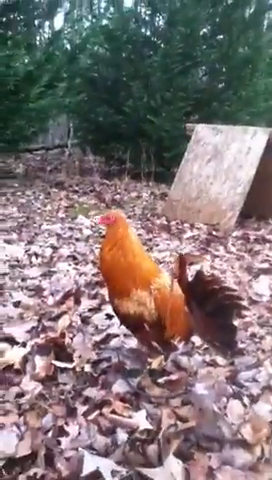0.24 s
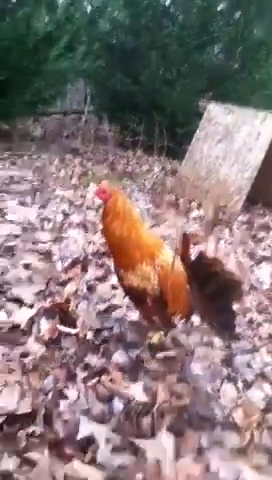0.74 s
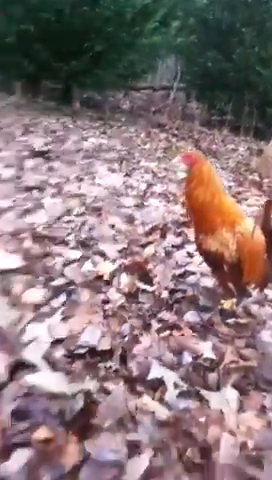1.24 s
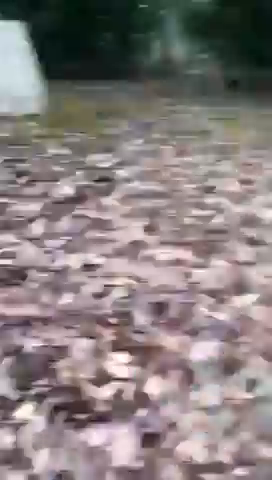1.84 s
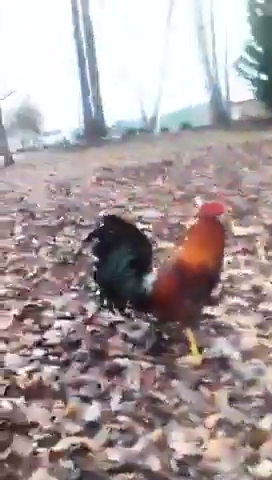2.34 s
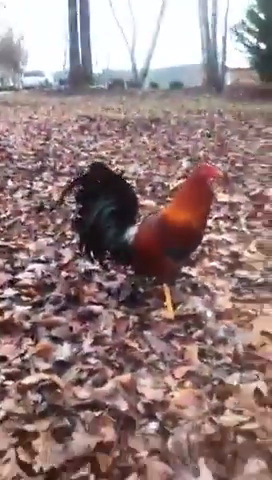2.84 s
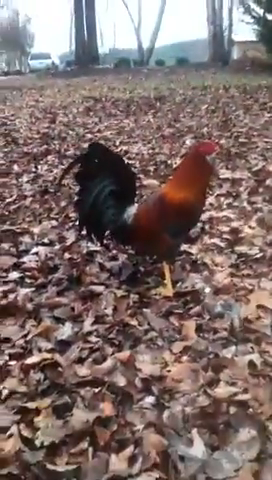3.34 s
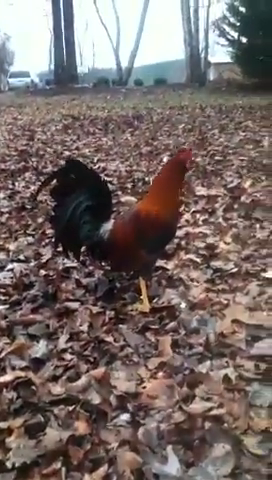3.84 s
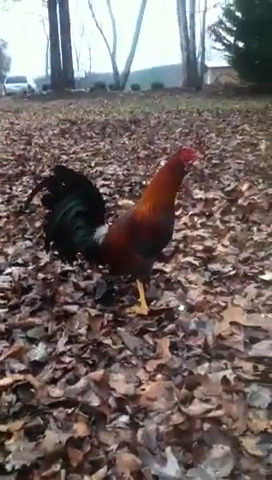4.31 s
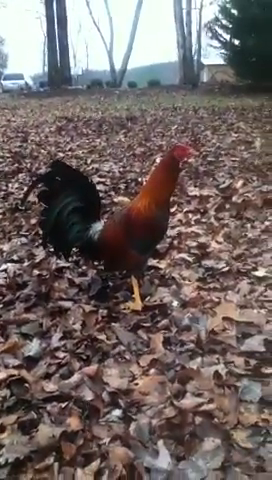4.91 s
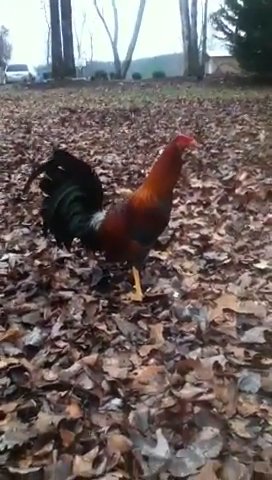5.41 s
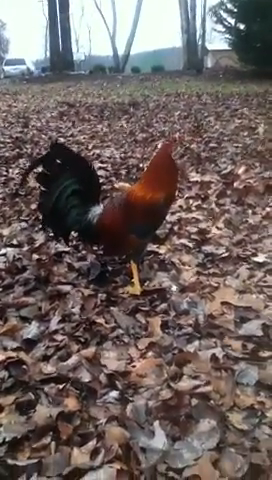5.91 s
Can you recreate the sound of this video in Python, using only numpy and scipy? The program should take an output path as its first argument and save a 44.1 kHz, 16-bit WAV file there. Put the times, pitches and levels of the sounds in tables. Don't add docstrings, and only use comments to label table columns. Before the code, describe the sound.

A few dry leaf crunches and a tap on the phone, then a young rooster crows one loud, raspy four-note call in a yard.

```python
import sys
import numpy as np
from scipy import signal
from scipy.fft import rfft, irfft
from scipy.io import wavfile
from scipy.ndimage import uniform_filter1d, minimum_filter1d, map_coordinates

SR = 44100
rng = np.random.default_rng(int(sys.argv[2]) if len(sys.argv) > 2 else 0)


def voltage_ratio(level):
    return 10 ** (np.asarray(level, float) / 20)


def store_pcm(level_fs):
    pcm = np.round(np.clip(level_fs, -1, 1) * 32767).astype(np.int16)
    wavfile.write(sys.argv[1], SR, np.atleast_2d(pcm).T)


N = 271656
T = np.arange(N) / SR

# (centre [Hz], width [Hz], level [dB])
THROAT = [(850, 180, 4), (1330, 570, -6.5), (1804, 500, -3.5), (2764, 140, -15), (3585, 330, -11.5),
          (6940, 2100, -28), (6340, 7400, -35), (8400, 1670, -38), (9800, 1000, -45.5)]
# (time [s], level drop [dB])
FLUTTER = [(3.780, 9.5), (3.801, 5.5), (3.821, -1.5), (3.838, 1.5), (3.856, 5.5), (3.946, 12.5), (4.654, 3),
           (4.701, 2)]
FLUTTER_HALF_MS = 1.3


def read(table, silent=None):
    s, *columns = np.transpose(table)
    return [np.interp(T, s, c, left=silent, right=silent) for c in columns]


def sounding(table, fade_s=.003):
    return np.clip(np.minimum(T - table[0][0], table[-1][0] - T) / fade_s, 0, 1)


def bell(s, half_ms):
    return np.exp(-((T - s) / (half_ms / 1000)) ** 2)


def unit(x):
    return x / np.sqrt(np.mean(x ** 2))


def resonate(x, modes):
    out = 0
    for hz, width_hz, db in modes:
        edges_hz = [max(hz - width_hz / 2, 20), min(hz + width_hz / 2, SR / 2.1)]
        band = signal.butter(2, edges_hz, "band", fs=SR, output="sos")
        out = out + voltage_ratio(db) * signal.sosfilt(band, x)
    return out


def wobble(rate_hz):
    low = signal.butter(2, rate_hz, fs=SR, output="sos")
    return unit(signal.sosfilt(low, rng.standard_normal(N)))


def stack(hz, rough, partial_db, jitter=.09, shimmer_db=5):
    wavering_hz = hz * (1 + jitter * rough * wobble(260))
    phase = 2 * np.pi * np.cumsum(wavering_hz) / SR
    out = 0
    for k, db in enumerate(partial_db):
        depth = rough * min(k + 1, 4) + .5 * (k > 1) + 0.19 * (k > 3)
        swing_db = shimmer_db * depth * np.minimum(wobble(65), .6)
        out = out + voltage_ratio(db + swing_db) * np.sin((k + 1) * phase + k * k)
    return np.sqrt(2) * out, phase


def yard():
    # (frequency [Hz], density [dB per Hz])
    yard_colour = [(15, -49.5), (25, -24.5), (108, -1.5), (326, -11.5), (476, -16.5), (641, -20),
                   (695, -18), (887, -18), (1260, -22.5), (2690, -27), (3720, -27), (12500, -30),
                   (16000, -35.5)]
    # (time [s], level [dB])
    traffic = [(0.0, -62), (0.17, -61.5), (0.47, -57), (0.66, -59.5), (1.06, -61), (1.53, -58.5),
               (1.9, -60.5), (2.96, -58.5), (3.7, -61.5)]
    yard_db = -57
    hz = np.maximum(np.arange(N // 2 + 1) * SR / N, 1)
    colour_hz, colour_db = np.transpose(yard_colour)
    colour = voltage_ratio(np.interp(np.log(hz), np.log(colour_hz), colour_db))
    noise = rfft(rng.standard_normal(N)) * colour
    swell_db = read(traffic)[0]
    swell_db = swell_db - swell_db.mean()
    out = 0
    for octave in range(5, 15):
        band = np.clip(1 - np.abs(np.log2(hz) - octave), 0, 1)
        restless = np.clip((11 - octave) / 4, 0, 1)
        motion_db = restless * (1.3 * swell_db + 1.8 * wobble(1.8))
        out = out + irfft(noise * band, N) * voltage_ratio(motion_db)
    return unit(out) * voltage_ratio(yard_db)


def birds():
    # (time [s], length [s], start pitch [Hz], end pitch [Hz], level [dB])
    calls = [
        (2.752, 0.18, 3280, 3200, -75.5),
        (5.979, 0.192, 2800, 2640, -75),
    ]
    out = 0
    for s, length_s, start_hz, end_hz, db in calls:
        done = np.clip((T - s) / length_s, 0, 1)
        whistle, _ = stack(start_hz + (end_hz - start_hz) * done, 0.2, [0])
        out = out + voltage_ratio(db) * np.sin(np.pi * done) ** 0.288 * whistle
    return out


def trees(voice):
    # (centre [Hz], width [Hz], level [dB], T60 [s])
    trunks = [(910, 310, -16.5, 1.8), (1900, 270, -4.5, 1.88), (2780, 500, -0.5, 1.4),
              (5000, 5000, -2.5, 1)]
    sway_ms, sway_hz = .05, 14
    t = T[:int(1.6 * SR)]
    near = voltage_ratio(-51) * rng.standard_normal(len(t)) * voltage_ratio(-60 * t / .12) * (t > .002)
    shed = voltage_ratio(-51) * rng.standard_normal(len(t)) * voltage_ratio(-60 * t / 0.34) * (t > .03)
    scatter = rng.standard_normal(len(t))
    far = 0
    for hz, width_hz, db, t60_s in trunks:
        far = far + resonate(scatter, [(hz, width_hz, db)]) * voltage_ratio(-60 * t / t60_s)
    far = voltage_ratio(-60.0) * far * np.clip(t / 0.057, 0, 1) * voltage_ratio(1.2 * wobble(7.3)[:len(t)])
    late = signal.fftconvolve(voice, shed + far)[:N]
    swayed_s = T + sway_ms / 1000 * wobble(sway_hz)
    late = map_coordinates(late, [swayed_s * SR], mode="mirror")
    return signal.fftconvolve(voice, near)[:N] + late


def rustle(s, hold_s):
    rise_db_s, settle_db_s = 712, 465
    early_s, late_s = np.clip(s - T, 0, None), np.clip(T - s - hold_s, 0, None)
    return voltage_ratio(-rise_db_s * early_s - settle_db_s * late_s)


def leaves():
    # (time [s], hold [s], crunch [dB], hiss [dB])
    rustles = [(0.203, 0.0037, -57.5, -68), (0.749, 0.021, -51, -55.5), (0.861, 0.11, -73, -62.5),
               (1.058, 0.029, -78, -56.5), (1.175, .005, -63, -63), (1.253, .005, -64, -64),
               (1.35, 0.12, -80, -59.5), (1.394, 0.051, -46, -75), (1.465, 0.063, -54.5, -65.5),
               (1.626, 0.059, -56.5, -63), (1.686, 0.063, -58.5, -66), (1.72, 0.74, -68, -65),
               (2.087, 0.02, -80, -66), (2.174, 0.03, -67, -69.5), (2.377, .005, -69, -80),
               (2.439, 0.0094, -53.5, -59), (2.5, 0.59, -68, -70), (3.152, .005, -75, -70.5),
               (3.215, .003, -73, -65)]
    # (centre [Hz], width [Hz], level [dB])
    crunch_ring = [(455, 300, 15), (900, 350, 12), (1246, 880, 15), (1810, 490, -1)]
    # (centre [Hz], width [Hz], level [dB])
    hiss_ring = [(3630, 2600, 9), (5960, 3900, 8), (8640, 4600, 0.5), (14300, 3900, 2.5)]
    # (time [s], hold [s], level [dB])
    curls = [
        (1.43, 0.078, -61.5),
        (1.65, .11, -61.5),
    ]
    # (centre [Hz], width [Hz], level [dB])
    curl_ring = [(5840, 860, 0)]
    size = voltage_ratio(2.8 * rng.exponential(size=(2, N)))
    cracks = rng.standard_normal((2, N)) * size * (rng.random((2, N)) < .3)
    crunch = unit(resonate(cracks[0], crunch_ring)) * voltage_ratio(1.8 * wobble(50))
    hiss = unit(resonate(cracks[1], hiss_ring)) * voltage_ratio(0.3 * wobble(43))
    curl = unit(resonate(cracks[0], curl_ring))
    out = 0
    for s, hold_s, crunch_db, hiss_db in rustles:
        out = out + rustle(s, hold_s) * (voltage_ratio(crunch_db) * crunch + voltage_ratio(hiss_db) * hiss)
    for s, hold_s, db in curls:
        out = out + rustle(s, hold_s) * voltage_ratio(db) * curl
    return out


def snaps():
    # (time [s], peak [dB], ring [Hz])
    leaf_snaps = [(1.392, -38, 840), (1.418, -34, 850), (1.426, -29, 980), (1.432, -34, 1400),
                  (1.443, -38, 993), (1.467, -34, 980), (1.491, -35.5, 1380), (1.51, -44, 1350),
                  (1.555, -46, 900), (1.622, -42, 990), (1.641, -43, 1390), (1.683, -40, 1070),
                  (1.692, -41, 1290), (1.704, -41.5, 1020), (1.754, -43, 1000), (2.441, -40, 813)]
    t60_s, rise_s, gain_db = 0.018, .0012, -1
    out, t = np.zeros(N), T[:900]
    decay = voltage_ratio(-60 * t / t60_s)
    for s, db, hz in leaf_snaps:
        grit = .3 * rng.standard_normal(len(t)) * decay
        ring = np.sin(2 * np.pi * hz * t) + grit
        i = int(s * SR)
        out[i:i + len(t)] += voltage_ratio(db + gain_db) * decay * np.minimum(t / rise_s, 1) * ring
    return out


def taps():
    # (time [s], peak [dB], body [Hz], crack [dB], push [dB])
    case_taps = [
        (0.859, -18.5, 384, -15.5, -2.5),
        (1.171, -45.5, 710, -12, -10),
        (1.383, -36, 396, -16, 1),
        (2.167, -45, 477, -15, -1),
        (2.347, -48.5, 425, -16, -1),
        (2.449, -44.5, 814, -7.5, 3),
    ]
    tick_ring = [(3640, 700, 8.4), (5200, 620, 9.6), (6400, 1060, 8.4), (8300, 1300, 1.7)]
    out, t = np.zeros(N), T[:1200]
    push = -1.2 * np.sin(np.pi * np.clip(t / 0.00055, 0, 1))
    late = np.clip(t - .0004, 0, None)
    for s, db, hz, crack_db, push_db in case_taps:
        cycles = hz * late * np.exp(-late / 0.012)
        swing = 2.06 * np.sin(2 * np.pi * cycles) * np.exp(-late / 0.0016)
        grit = 0.34 * rng.standard_normal(len(t)) * np.exp(-t / 0.0012)
        tick = resonate(3.6 * (t == 0) + grit, tick_ring)
        i = int((s + 0.0033) * SR)
        out[i:i + len(t)] += voltage_ratio(db) * (voltage_ratio(push_db) * push + swing + voltage_ratio(crack_db + 9.0) * tick)
    return signal.sosfilt(signal.butter(2, 90, "high", fs=SR, output="sos"), out)


def beak_thumps():
    # (time [s], half length [ms], pitch [Hz], level [dB])
    thumps = [
        (4.028, 10.5, 260, -45.5),
        (4.249, 11, 330, -51.5),
        (5.141, 5.9, 230, -49),
    ]
    out = 0
    for s, half_ms, hz, db in thumps:
        out = out + voltage_ratio(db) * bell(s, half_ms) * stack(hz + 0 * T, 0.31, [0, -4])[0]
    return out


def gulp():
    # (time [s], pitch [Hz], level [dB])
    gulp_curve = [(4.863, 269, -32), (4.872, 275.6, -38), (4.883, 308.7, -31), (4.893, 308, -38)]
    partial_db = [-11.5, -11.5, 2.5, 2.5, -16.5, -12.5, -21.5, -19.5, -19.0, -21, -19.5, -26.0, -32.0, -31.5]
    hz, db = read(gulp_curve)
    tone, _ = stack(hz, 0.31, partial_db)
    breath = unit(resonate(rng.standard_normal(N), THROAT))
    return sounding(gulp_curve) * voltage_ratio(db) * (tone + 0.8 * breath)


def soft_voice():
    # (time [s], second partial [Hz], level [dB])
    stretches = [
        [(3.732, 1102, -26.5), (3.74, 1185, -22.5), (3.75, 1260, -23.5), (3.758, 1320, -22)],
        [(3.958, 1180, -22.5), (3.966, 1242, -24), (4.006, 1173, -27.5), (4.015, 1310, -22.5)],
        [(4.14, 1001, -27), (4.17, 1054, -46), (4.201, 1200, -38), (4.222, 1248, -30.5)],
        [(4.772, 1281, -28), (4.778, 1240, -27.5), (4.802, 1185, -35.5), (4.854, 1148, -45.5),
         (4.862, 1124, -33.5)],
        [(4.89, 1148, -32.5), (4.912, 1179, -36.5), (4.948, 1214, -27.5), (4.962, 1278, -25), (4.97, 1320, -29)],
    ]
    # (time [s], second partial [Hz], level [dB])
    last_fall = [(5.129, 1497, -35), (5.139, 1259, -28.5), (5.148, 1012, -33), (5.16, 777, -44)]
    soft_rough = [.2, .12, .35, .27, .11, .2]
    # (multiple, level [dB])
    soft_partials = [(1, -13), (2, 2.5), (3, -6.5), (4, -16), (5, -17), (6, -23), (7, -42.5), (8, -48),
                     (9, -52.5), (10, -52.5), (11, -38), (12, -46)]
    # (time [s], length [s], pitch [Hz],
    # level [dB])
    undertones = [(3.939, 0.011, 1190, -22.5), (4.03, 0.008, 354, -12), (4.061, 0.016, 668.3, -25),
                  (4.257, 0.011, 688, -20), (4.663, 0.018, 1169, -36.5), (4.713, 0.042, 1162, -38.5),
                  (4.797, 0.016, 820, -29.5), (4.92, 0.014, 801.4, -28), (4.16, 0.023, 850, -38),
                  (4.198, 0.04, 825.3, -36.5), (4.868, 0.011, 814, -28.5), (4.981, 0.018, 1301, -41)]
    out = 0
    breath = unit(resonate(rng.standard_normal(N), THROAT))
    partial_db = [db for _, db in soft_partials]
    for part, rough in zip(stretches + [last_fall], soft_rough):
        second_hz, db = read(part)
        tone, _ = stack(second_hz / 2, rough, partial_db)
        out = out + sounding(part) * voltage_ratio(db) * (tone + 2.0 * rough * breath)
    for s, length_s, hz, db in undertones:
        swell = np.exp(-(2 * (T - s) / length_s) ** 2)
        out = out + voltage_ratio(db) * swell * stack(hz + 0 * T, 0.82, [0])[0]
    return out


def roughness(notes):
    # (lock time [s], roughness before [0-1], tired roughness [0-1], last rattle [s])
    locking = [
        (3.865, .14, .2, .024),
        (4.07, .33, .04, .004),
        (4.27, .3, .15, .006),
        (4.975, .2, .04, -.002),
    ]
    locked_rough, last_rough, lock_s, tiring_power = .008, .55, .01, 6
    rough = np.zeros(N)
    for note, (locks, before, tired, last_s) in zip(notes, locking):
        start, end = note[0][0], note[-1][0]
        loose = before * np.clip((locks - T) / lock_s + .5, 0, 1)
        tiring = tired * np.clip((T - locks) / (end - locks), 0, 1) ** tiring_power
        last = last_rough * np.clip((T - end + last_s) / lock_s + .5, 0, 1)
        rough += (T >= start) * (T <= end) * (locked_rough + np.maximum(loose + tiring, last))
    return rough


def sags():
    # (time [s], half length [ms], level drop [dB])
    slips = [(3.766, 4, 3.5), (3.897, 3.6, -2), (3.917, 3.44, -2), (3.952, 3, -1.5), (4.025, 2.2, 6.5),
             (4.039, 2, 8), (4.054, 2.6, 7), (4.062, 2.6, 6), (4.229, 2, 6.5), (4.254, 2.2, 3),
             (4.26, 2.99, 3), (4.661, 4, 3.5), (4.69, 3.4, 4), (4.729, 4.5, 2.5)]
    # (time [s], dip [Hz], half length [ms])
    warbles = [(4.312, 16.5, 5.9), (4.33, 60.6, 4.3), (4.352, 34, 5.5), (4.368, 25.6, 3.6),
               (4.383, 14.4, 6.8), (4.521, 56, 3.1), (4.551, 53.5, 3.95), (4.579, 66, 6.3), (4.618, 74, 11),
               (4.646, 88, 4.68), (4.682, 45.6, 10.1), (4.722, 26, 8.5), (4.751, 11, 7.5)]
    slip_hz_ms, kick_hz, sag_hz, sag_late_ms = 149.5, 67, 36.47, 6.6
    dip, drop, warble = np.zeros(N), np.zeros(N), np.zeros(N)
    for s, drop_db in FLUTTER:
        kick = bell(s, FLUTTER_HALF_MS)
        sag = bell(s + sag_late_ms / 1000, FLUTTER_HALF_MS)
        dip += sag_hz * sag - kick_hz * kick
        drop += drop_db * kick
    for s, half_ms, drop_db in slips:
        slip = bell(s, half_ms)
        dip += slip_hz_ms / half_ms * slip
        drop += drop_db * slip
    for s, dip_hz, half_ms in warbles:
        warble += dip_hz * bell(s, half_ms)
    return dip + warble, drop, warble


def second_partial_chokes():
    # (time [s], half length [ms], level drop [dB])
    chokes = [(3.768, 2.5, 3.5), (3.784, 1, 6), (3.794, 1.5, 4), (3.811, 2, 6), (3.824, 1.1, 10),
              (3.831, 1.5, 3), (3.859, 0.92, 12.5), (3.92, 2, 5), (3.926, 1.5, 8.5), (4.485, 5.5, 3),
              (4.506, 6.7, 5), (4.542, 5, 2), (4.568, 5, 2.5), (4.616, 6, 3.5), (4.651, 2.34, 7.5),
              (4.703, 1.76, 4), (5.101, 3, 13), (5.121, 3, 4)]
    choke_db, late_ms = 6.5, 0.46
    out = 0
    for s, _ in FLUTTER:
        out = out + choke_db * bell(s + late_ms / 1000, FLUTTER_HALF_MS)
    for s, half_ms, db in chokes:
        out = out + db * bell(s, half_ms)
    return out


def upper_partials(hz, level, strain, bright, dip):
    # (frequency [Hz], level [dB])
    middle_colour = [(2400, 0.5), (2700, 1), (2950, -6), (3300, -13), (3650, 1.5), (3800, -0.5), (3960, -7),
                     (4300, -20.5)]
    # (frequency [Hz], level [dB])
    brilliance = [(4400, -17.5), (4650, -4), (4900, -11), (5300, -2.5), (5850, -11), (6250, -4.5),
                  (6800, -5.5), (7200, -16.5), (7500, -3), (8000, -15.5), (8900, -7), (9800, -11),
                  (10700, -14.5), (11600, -23.5), (12300, -33), (13000, -28), (13700, -11), (14600, -13),
                  (15500, -28)]
    # (time [s], third partial [dB], sixth and seventh [dB])
    tongue = [(3.755, 0.5, 3), (3.775, 18, 16.5), (3.82, 6.5, 13), (3.87, 7, 10.5), (3.90, 7.5, 1.5),
              (3.95, -4, 2), (4.02, 4.5, -2.5), (4.08, 0, -5.5), (4.107, 8.5, -1), (4.135, 2.5, -0.5),
              (4.28, -3.5, -2), (4.5, -3.5, -4), (4.62, 0, -11.5), (4.75, -0.5, -16), (4.99, -8, -3.5),
              (5.04, 2.5, 8), (5.09, 7, 3), (5.13, -8, -12.5)]
    break_db_per_hz_ms, top_per_level, full_db = 0.37, 1.8, -9.5
    middle = -22.5 + 0.44 * strain
    broken = break_db_per_hz_ms * np.minimum(np.abs(np.gradient(dip)) * SR / 1000, 12)
    top_loss = top_per_level * np.minimum(level - full_db, 0)
    third, sixth = read(tongue)
    out = []
    for k in range(3, 17):
        if k < 5:
            db = middle - 0.73 * broken + np.interp(k * hz, *np.transpose(middle_colour))
        else:
            db = bright - broken + np.interp(k * hz, *np.transpose(brilliance))
        if k > 7:
            db = db + top_loss
        if k == 3:
            db = db + third
        if k in (6, 7):
            db = db + sixth
        out.append(db)
    return out


def hoarse_air(puffs):
    # (time [s], half length [ms], level re note [dB])
    scrapes = [
        (3.79, 21, -32),
        (3.83, 21, -27),
        (3.90, 41, -35),
        (4.035, 15, -26.5),
        (4.06, 8.1, -27),
        (4.24, 18.4, -28),
        (4.7, 50, -39.5),
    ]
    # (centre [Hz], width [Hz], level [dB])
    hoarse_ring = [(2800, 500, 1.5), (3700, 730, -3), (4580, 1500, -8), (6450, 1600, 2.5),
                   (8030, 1500, -8.5)]
    swell = sum(voltage_ratio(db) * bell(s, half_ms) for s, half_ms, db in scrapes)
    return unit(resonate(puffs, hoarse_ring)) * swell


def loud_voice():
    # (time [s], pitch [Hz], fundamental [dB], beak opening/second partial [dB], strain [dB])
    first_note = [(3.75, 700, -9.5, -21.5, -0.5), (3.757, 863, -3, -10, -3.5), (3.766, 952.5, -2.5, 1, -3),
                  (3.80, 973.5, -9.5, -6, -0.5), (3.85, 968.3, -8, -4.5, 7.5), (3.887, 935.3, -11, 0.5, -5),
                  (3.92, 929.6, -10.5, -5.5, -3), (3.937, 883.8, -9.5, -6, -7),
                  (3.962, 802.6, -16.5, -16, 5)]
    # (time [s], pitch [Hz], fundamental [dB], beak [dB], strain [dB])
    second_note = [(4.011, 741.8, -13, -17.5, -2), (4.021, 859.3, -2.5, -17.5, 2),
                   (4.033, 898, -4, -13, 0.5), (4.058, 982.5, -11, -9.5, 10.5),
                   (4.084, 1045, -13.5, -7.5, 8), (4.103, 1001, -11.5, -15.5, 7),
                   (4.121, 952, -15, -10, -4.5), (4.137, 833, -12, -23, 4.5)]
    # (time [s], pitch [Hz], fundamental [dB], beak [dB], strain [dB])
    held_note = [(4.221, 732, -19, -13.5, 20.5), (4.243, 895, -3, -20.5, 3), (4.262, 936, -15, -3, 12),
                 (4.286, 962, -13.5, -3.5, 4), (4.491, 989.6, -11.5, -3, 1), (4.62, 982.4, -8, -3, 2),
                 (4.70, 936, -11, -5, 5), (4.749, 900, -13, -6.5, 6.5), (4.774, 900, -18.5, -5.5, 2)]
    # (time [s], pitch [Hz], fundamental [dB], beak [dB], strain [dB])
    last_note = [(4.967, 777.3, -10.5, -39, 2), (4.972, 871, -14.5, -9, 0), (4.987, 880, -17.5, -2, 11.5),
                 (5.02, 892, -17, -0.5, 4), (5.081, 889.3, -15.5, -2.5, -2), (5.112, 864, -14, -12.5, 11),
                 (5.13, 787, -13.5, -30.5, 5.5), (5.135, 754, -19, -20, 1)]
    warble_db_per_hz, second_db_per_hz, strain_db_per_hz = 0.0765, 0.02, -0.0137
    notes = [first_note, second_note, held_note, last_note]
    hz, level, second, strain = read(sum(notes, []))
    rough = roughness(notes)
    dip, drop, warble = sags()
    hz = hz - dip
    strain = strain + strain_db_per_hz * dip
    bright = -36.5 + strain
    second = second - 0.6 * drop - second_partial_chokes() - second_db_per_hz * warble
    partial_db = [-warble_db_per_hz * warble, second] + upper_partials(hz, level, strain, bright, dip)
    tone, phase = stack(hz, rough, partial_db)
    puffs = rng.standard_normal(N) * (1 + np.cos(phase)) * voltage_ratio(2.5 * wobble(120))
    rasp = unit(resonate(puffs, THROAT[:5])) * voltage_ratio(0.5)
    hiss = unit(resonate(puffs, THROAT[5:])) * voltage_ratio(bright - 4)
    share = np.clip(rough + np.clip(drop - 2, 0, None) * .035, 0, .95)
    hissing = np.minimum(.16 + 4 * share, 1)
    source = np.sqrt(1 - share ** 2) * tone + share * rasp + hissing * hiss + hoarse_air(puffs)
    gate = sum(sounding(note) for note in notes)
    return gate * voltage_ratio(level - drop) * source


def rooster():
    # (centre [Hz], width [Hz])
    pockets = [(5350, 400), (7350, 150)]
    voice_band = signal.butter(6, [540, 11400], "band", fs=SR, output="sos")
    voice = signal.sosfilt(voice_band, loud_voice() + soft_voice())
    voice = voice + gulp() + beak_thumps()
    for hz, width_hz in pockets:
        voice = signal.lfilter(*signal.iirnotch(hz, hz / width_hz, fs=SR), voice)
    return voice


def scene():
    floor = yard()
    voice = rooster()
    crowing = 1 / (1 + voltage_ratio(-30.0) / (uniform_filter1d(np.abs(voice), size=3000) + 1e-9))
    top = signal.sosfiltfilt(signal.butter(4, 11000, "high", fs=SR, output="sos"), floor)
    floor = (1 - 0.2 * crowing) * floor - .2 * crowing * top
    mix = floor + birds() + trees(voice) + leaves() + snaps() + taps() + voice
    return mix[None]


def band_limit(x):
    return signal.sosfilt(signal.butter(12, 15830, fs=SR, output="sos"), x)


def record(dry):
    crest = uniform_filter1d(-minimum_filter1d(-np.abs(dry), size=400), size=200)
    held = dry * np.minimum(1, .71 / (crest + 1e-9))
    low_pass = signal.ellip(8, .2, 70, 15800, fs=SR, output="sos")
    return band_limit(signal.sosfilt(low_pass, held))


dry = scene()
out = record(dry)
store_pcm(out)
```